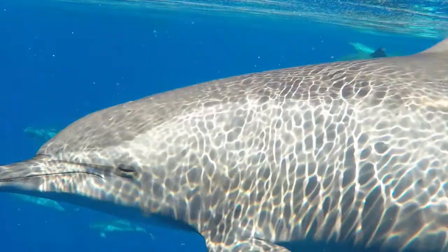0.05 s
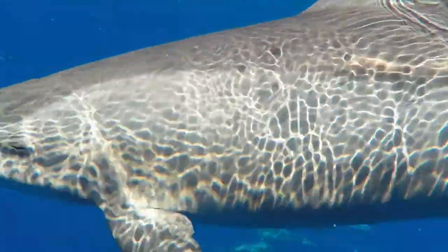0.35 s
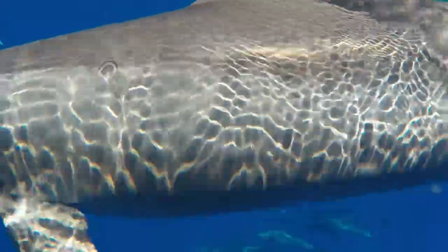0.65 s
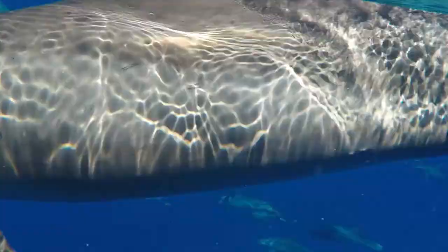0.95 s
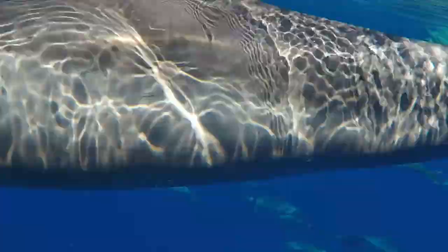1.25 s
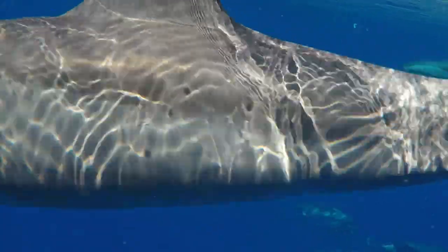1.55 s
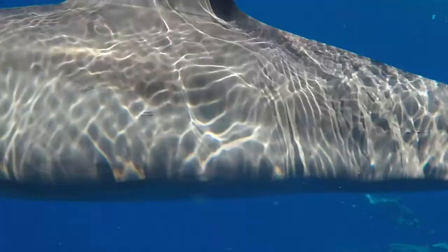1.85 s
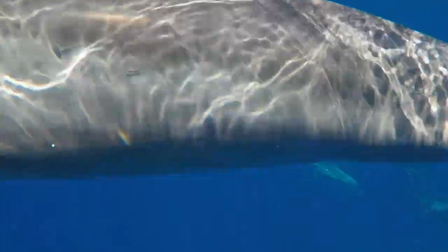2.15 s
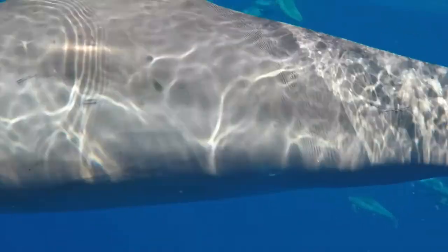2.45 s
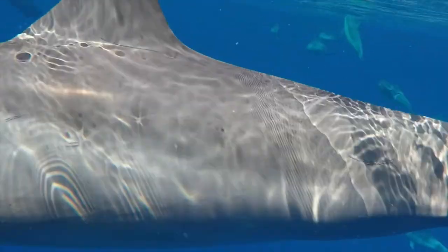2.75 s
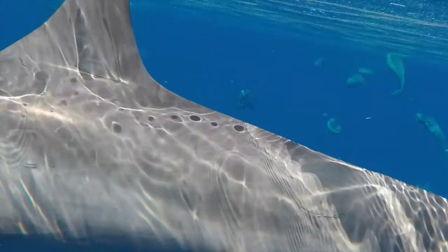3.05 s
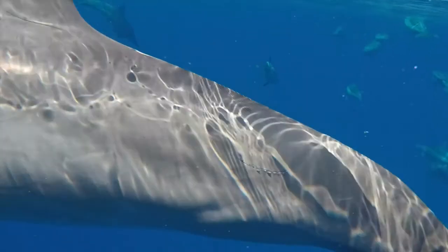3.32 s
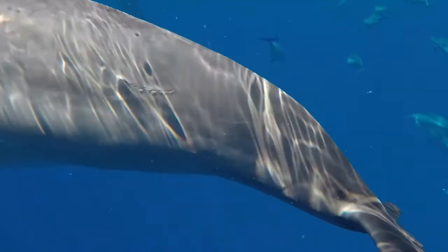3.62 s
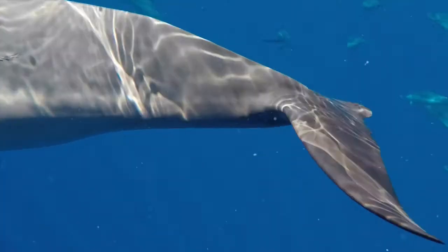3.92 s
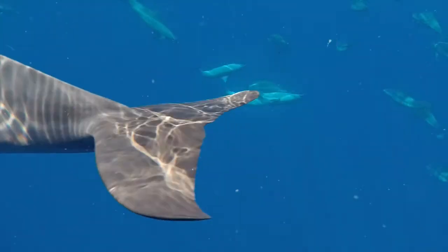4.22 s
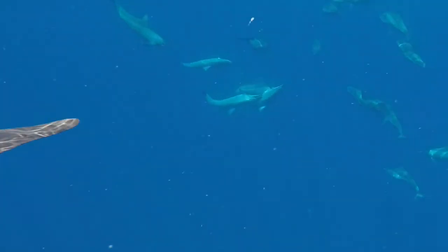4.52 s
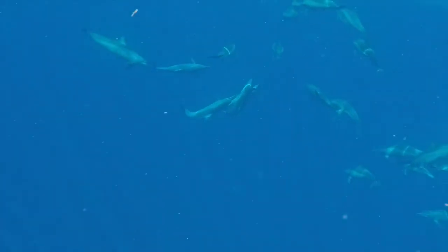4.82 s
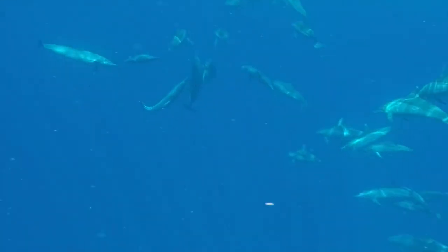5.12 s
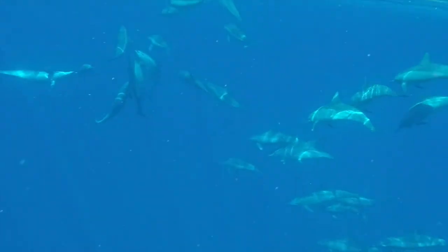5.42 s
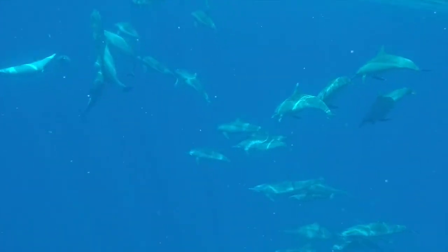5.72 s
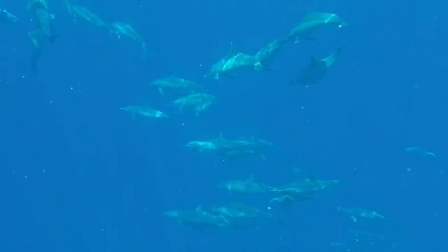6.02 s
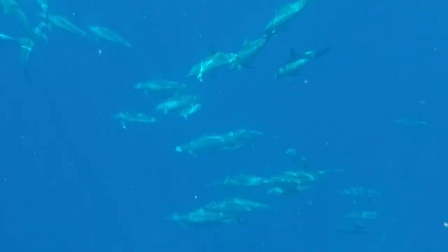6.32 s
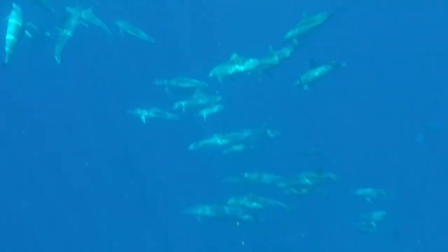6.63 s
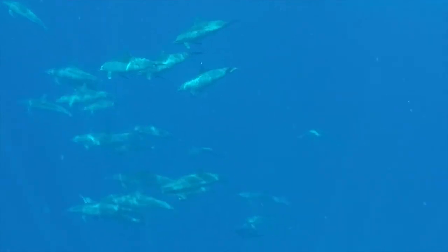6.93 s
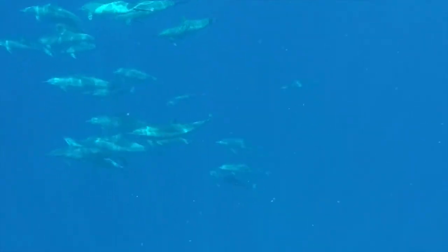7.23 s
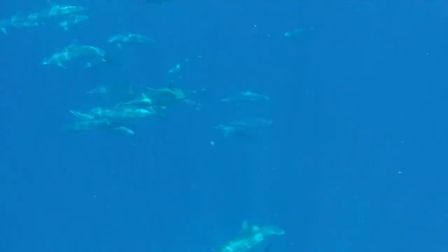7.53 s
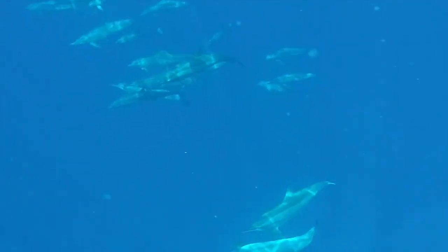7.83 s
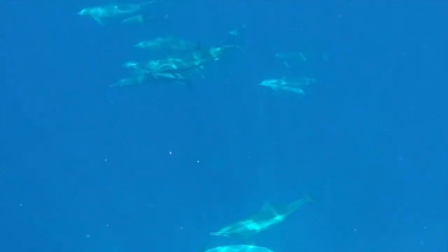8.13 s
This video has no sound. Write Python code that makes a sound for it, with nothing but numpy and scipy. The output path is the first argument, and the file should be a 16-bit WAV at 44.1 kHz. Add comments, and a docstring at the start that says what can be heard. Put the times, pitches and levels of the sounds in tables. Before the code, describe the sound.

Throughout, a microphone just under the sea surface picks up low rumbling, softly sloshing water and a fine crackle and ticking of distant dolphins. From about 1 to 4 seconds, closer dolphins send quick trains of sharp, ringing clicks, with a soft thump and a thin buzz near 2 seconds. A faint high whistle comes just after 3 seconds. From about 4 to 6 seconds, very high, fluttering whistles sweep upward one after another among scattered clicks, the strongest near 5.7 seconds. A thump and a bubble plop at 4.6 seconds lead into light taps. Between 5.9 and 6.5 seconds come a loud short buzz, knocks and rubs on the microphone casing, and deep thumps of water, the loudest moment. Two more long rising whistles run from 6.7 to 8 seconds, joined near the end by short buzzes, small plops and a very faint distant boat engine.

```python
"""Dolphins passing under water

A school passes a camera held just under the surface of the open sea. The dolphins whistle in long
rising sweeps that flutter under the moving surface; their clicks and buzzes ring the camera housing.
Turbulent water rumbles and washes past, bubbles plop, the housing is shoved, knocked and rubbed,
and a far boat engine drones."""
import sys
import numpy as np
from scipy import signal
from scipy.fft import rfft, irfft, next_fast_len
from scipy.io import wavfile

SR = 44100
rng = np.random.default_rng(int(sys.argv[2]) if len(sys.argv) > 2 else 0)


def master_out(mix):
    """Clip the mix to full scale and print it as 16-bit PCM to the path in sys.argv[1]."""
    frames = np.transpose(np.atleast_2d(mix))
    ceiling = np.clip(frames, -1, 1)
    pcm = np.round(ceiling * 32767).astype(np.int16)
    wavfile.write(sys.argv[1], SR, pcm)


N = 360297
TIME = np.arange(N) / SR
CUTOFF_HZ = 15500


def from_db(db):
    """Decibels to gain."""
    return 10 ** (np.asarray(db) / 20)


def unit_rms(x):
    """Scale to unit power."""
    return x / np.sqrt(np.mean(x ** 2) + 1e-20)


def curve(rows):
    """Rows of (t/s, value) interpolated at every sample."""
    return np.interp(TIME, *np.transpose(rows))


def add(out, start_s, sound):
    """Mix a sound in from start_s on."""
    i = int(np.clip(start_s * SR, 0, N - 1))
    out[i:i + len(sound)] += sound[:N - i]


def drift(rate_hz, size=N):
    """Smooth random wander, rms 1."""
    knots = rng.standard_normal(4000)
    return unit_rms(np.interp(np.arange(size) * rate_hz / SR, np.arange(len(knots)), knots))


def coloured(x, spectrum):
    """Shape by rows of (f/Hz, gain/dB), silent outside them; rms 1."""
    hz, db = np.transpose(spectrum)
    size = next_fast_len(N)
    log_hz = np.log(np.fft.rfftfreq(size, 1 / SR) + 1)
    gain = from_db(np.interp(log_hz, np.log(hz), db, left=-np.inf, right=-np.inf))
    return unit_rms(irfft(rfft(x, size) * gain, size)[:N])


def band(x, low_hz, high_hz, order=2):
    """Causal band-pass."""
    sos = signal.butter(order, [low_hz, high_hz], "band", fs=SR, output="sos")
    return signal.sosfilt(sos, x + 1e-18)


def ring(clicks, hz, t60_s):
    """One mode: a unit click starts a decaying sine of height 1."""
    r, w = np.exp(-np.log(1000) / (t60_s * SR)), 2 * np.pi * hz / SR
    return signal.lfilter([0, np.sin(w)], [1, -2 * r * np.cos(w), r * r], clicks + 1e-18)


def pulse_train(rate_hz, click_at_start=False):
    """One unit pulse per cycle of a varying rate."""
    return np.diff(np.floor(np.cumsum(rate_hz) / SR), prepend=-1 if click_at_start else 0)


def sea_echo(x, t60_s, wet_db):
    """Scatter from the rippled surface trails behind a sound."""
    t = np.arange(SR) / SR
    tail = rng.standard_normal(SR) * np.exp(-np.log(1000) * t / t60_s) * (1 - np.exp(-t / 0.0031))
    return x + from_db(wet_db) * signal.fftconvolve(x, tail / np.linalg.norm(tail))[:N]


# Swells past the housing: crest/s, rise/s, fall/s, slosh/dB, wash/dB
SWELLS = [(.6, .22, 0.34, -59.5, -50.5), (1.42, 0.14, 0.17, -58.5, -52.5), (1.82, 0.077, 0.13, -53, -52.5),
          (2.27, 0.1, 0.07, -55.5, -53), (3.33, 0.34, 0.44, -60, -50.5), (3.8, 0.068, 0.19, -62.5, -63.5),
          (4.75, 0.49, 0.78, -57.5, -53.5), (5.93, 0.056, 0.087, -36.5, -65), (6.3, 0.23, 0.087, -53, -55),
          (6.85, 0.49, 0.3, -55.5, -55.5), (8.05, 0.46, 0.37, -58.5, -55)]


def swells(calm_slosh_db=-67, calm_wash_db=-63):
    """Slosh and wash envelopes in dB: each swell builds and ebbs over the calm."""
    slosh_power, wash_power = from_db(calm_slosh_db) ** 2, from_db(calm_wash_db) ** 2
    for crest_s, rise_s, fall_s, slosh_db, wash_db in SWELLS:
        width_s = np.where(TIME < crest_s, rise_s, fall_s)
        shape = np.exp(-np.minimum(((TIME - crest_s) / width_s) ** 2, 20))
        slosh_power += shape * from_db(slosh_db) ** 2
        wash_power += shape * from_db(wash_db) ** 2
    return 10 * np.log10(slosh_power), 10 * np.log10(wash_power)


def turbulence(level_db, spectrum, grain_db, grain_hz):
    """Water noise that comes in lumps."""
    lumps = rng.standard_normal(N) * from_db(grain_db * drift(grain_hz))
    return from_db(level_db) * coloured(lumps, spectrum)


# Water spectra: f/Hz, gain/dB
RUMBLE_SPECTRUM = [(12, 5), (22, 5), (32, -7), (48, -3.5), (70, -10.5), (110, -27), (200, -65)]
SLOSH_SPECTRUM = [(45, -55), (80, 1), (130, 1), (200, -2.5), (300, -13), (500, -20.5), (900, -50)]
WASH_SPECTRUM = [(180, -19), (330, -1.5), (470, -5.5), (620, 2), (820, -1), (1020, -12), (1350, -11.5),
                 (1550, -14), (2500, -22)]
FIZZ_SPECTRUM = [(800, -7), (1150, -1), (1400, -4), (1650, 1), (1950, -1), (2800, -29)]


def water():
    """Rumble, slosh and wash follow the swells; tiny bubbles fizz in the stronger ones."""
    slosh_db, wash_db = swells()
    rumble_db = -46 + 0.25 * (slosh_db + 67)
    fizz_db = -66 + 1.64 * (wash_db + 47.5)
    rumble = turbulence(rumble_db, RUMBLE_SPECTRUM, grain_db=3, grain_hz=12)
    slosh = turbulence(slosh_db + 3, SLOSH_SPECTRUM, grain_db=2.5, grain_hz=40)
    wash = turbulence(wash_db - 2.5, WASH_SPECTRUM, grain_db=2, grain_hz=150.5)
    fizz = turbulence(fizz_db, FIZZ_SPECTRUM, grain_db=1.5, grain_hz=203)
    return rumble + slosh + wash + fizz


# Engine envelope: t/s, level/dB
ENGINE_LEVEL = [(0, -75), (3.5, -68), (6.5, -82), (7.2, -56), (8.17, -65)]
# Engine spectrum: f/Hz, gain/dB
ENGINE_SPECTRUM = [(450, -36), (590, -8), (645, 8), (700, -6), (900, -75)]


def engine():
    """A far boat drones as a narrow band of noise."""
    return from_db(curve(ENGINE_LEVEL)) * coloured(rng.standard_normal(N), ENGINE_SPECTRUM)


# Crackle envelope: t/s, level/dB
CRACKLE_LEVEL = [(0.0, -63), (1.09, -59.5), (5.96, -58.5), (6.12, -56), (6.53, -59.5), (8.17, -55.5)]
# Crackle spectrum: f/Hz, gain/dB
CRACKLE_SPECTRUM = [(900, -9), (1500, -16), (1700, 3.5), (1950, 0), (2200, -8), (2620, 4.5), (3000, -3.5),
                    (3350, -0.5), (3700, -7), (5000, -12), (5900, -12), (6700, -17), (7500, -12),
                    (10000, -18), (15500, -20.5)]


def far_crackle(rate_hz=700, spread_db=4, hiss_gain=0.35):
    """Countless far clicks of the school merge into a fine crackle."""
    sizes = from_db(spread_db * np.minimum(rng.exponential(1, N), 4)) * rng.choice([-1, 1], N)
    clicks = sizes * (rng.random(N) < rate_hz / SR)
    hiss = hiss_gain * rng.standard_normal(N)
    return from_db(curve(CRACKLE_LEVEL) - 0.3) * coloured(clicks + hiss, CRACKLE_SPECTRUM)


# Tick envelope: t/s, level/dB
TICK_LEVEL = [(0, -48.5), (1, -52), (2.102, -50.5), (3, -49.5), (4, -48), (5.5, -58), (6.5, -54),
              (8.17, -69)]


def far_ticks(rate_hz=70, spread_db=4):
    """Other dolphins' beams sweep by as thin, bright ticks at random times."""
    sizes = from_db(curve(TICK_LEVEL) + spread_db * np.minimum(rng.exponential(1, N), 3))
    ticks = sea_echo(sizes * (rng.random(N) < rate_hz / SR), t60_s=0.012, wet_db=2.5)
    return band(ticks, 11800, 12200) + from_db(-5.5) * band(ticks, 2700, 8800)


# Housing modes: f/Hz, gain/dB, t60/s
HOUSING_MODES = [(1810, -27, 0.022), (2704, -2, 0.012), (3277, -1.5, 0.012), (4010, 2, 0.0037),
                 (5860, -1.5, 0.0068), (7300, -25, 0.013)]


def housing(clicks):
    """Pressure pulses ring the housing's modes."""
    return sum(from_db(db) * ring(clicks, hz, t60_s) for hz, db, t60_s in HOUSING_MODES)


# Far scan envelope: t/s, level/dB
FAR_SCAN_LEVEL = [(0, -59), (.4, -54), (.8, -54), (1.2, -56), (1.8, -56), (2.6, -47), (3.0, -51),
                  (4.4, -49.5), (6.6, -59), (8.17, -66)]


def far_scan(rate_hz=27, spread_db=1):
    """A far dolphin scans at an uneven pace, ringing the housing."""
    pulses = pulse_train(rate_hz * from_db(2 * drift(14)))
    return housing(pulses * from_db(curve(FAR_SCAN_LEVEL) - 3.5 + spread_db * drift(60)))


# Bright scan envelope: t/s, level/dB
BRIGHT_SCAN_LEVEL = [(0, -58), (1.2, -49), (2.4, -44), (3.1, -43), (3.5, -58), (6.3, -54), (6.55, -46),
                     (7, -56), (8.17, -62)]


def bright_scan(rate_hz=36, spread_db=3):
    """A far dolphin scans fairly evenly, heard only in the top treble."""
    pulses = pulse_train(rate_hz * from_db(1.4 * drift(8)))
    clicks = pulses * from_db(curve(BRIGHT_SCAN_LEVEL) + spread_db * drift(50))
    return band(sea_echo(clicks, t60_s=0.0045, wet_db=7.5), 12000, 14000)


# Shoves of water: t/s, level/dB, first f/Hz, last f/Hz, rise/s
THUMPS = [(0.128, -37, 45, 31.5, 0.04), (1.96, -35.5, 54.7, 30, 0.024), (4.578, -23, 129, 90, 0.0038),
          (5.937, -19, 70, 32.8, 0.012), (6.174, -9, 55, 21.3, 0.014), (6.396, -21, 48, 23.3, 0.021)]


def thumps(glide_s=0.02):
    """A shove of water on the housing swings the pressure a few times, ever slower."""
    out, t = np.zeros(N), np.arange(SR // 2) / SR
    for start_s, db, first_hz, last_hz, rise_s in THUMPS:
        hz = last_hz + (first_hz - last_hz) * np.exp(-t / glide_s)
        envelope = from_db(db) * t / rise_s * np.exp(1 - t / rise_s)
        add(out, start_s, -envelope * np.sin(2 * np.pi * np.cumsum(hz) / SR))
    return out


# Bumps and rubs: t/s, rise/s, decay/s, level/dB, f/Hz
KNOCKS = [(0.224, 0.0011, .003, -45.5, 650), (1.529, 0.017, 0.046, -44.5, 168),
          (1.97, .01, 0.034, -40, 111), (4.577, 0.0036, 0.0061, -36, 327), (3.336, .001, .003, -49, 900),
          (4.726, 0.0018, 0.0046, -41, 456), (4.783, 0.0014, 0.0031, -47.5, 645),
          (4.865, 0.0017, 0.0043, -46.5, 545), (4.933, .002, 0.0056, -45.5, 600),
          (4.987, 0.0016, 0.0037, -43.5, 420), (5.881, 0.00088, 0.0015, -29, 830),
          (5.889, 0.02, 0.015, -29, 148), (5.94, 0.024, 0.016, -28.5, 157),
          (5.993, 0.0055, 0.036, -33.5, 170), (6.164, 0.0049, 0.0035, -20.5, 1700),
          (6.272, 0.013, 0.004, -40.5, 2380), (6.289, 0.0031, 0.0068, -36.5, 1280),
          (6.322, 0.0072, .012, -42.5, 900), (6.394, 0.0016, 0.017, -36, 565),
          (6.416, 0.001, 0.0065, -33, 1290), (6.746, 0.0039, 0.024, -41.5, 626),
          (7.608, 0.00086, 0.001, -38, 1140)]


def knocks(grain_db=3, rattle_db=-27):
    """Short bursts of stick and slip on the housing, each in its own band."""
    out, t = np.zeros(N), np.arange(SR // 4) / SR - 0.05
    for peak_s, rise_s, decay_s, db, hz in KNOCKS:
        slips = rng.standard_normal(len(t)) * from_db(grain_db * drift(922.5, len(t)))
        rub = band(slips, hz * 0.43, hz * 0.76, order=1)
        rub = unit_rms(band(rub, hz * 0.054, hz * 6, order=1))
        envelope = from_db(db) * np.exp(-np.where(t < 0, -t / rise_s, t / decay_s))
        add(out, peak_s + t[0], envelope * rub)
    return out + from_db(rattle_db) * housing(out)


# Sonar scans: start/s, end/s, first gap/s, last gap/s, first level/dB, last level/dB, ring f/Hz
SCANS = [(1.158, 1.431, 0.027, .045, -47, -44.5, 2700), (1.483, 1.699, 0.049, 0.039, -43.5, -39.5, 2570),
         (1.725, 2.1552, 0.04, 0.035, -42.5, -35.5, 2570), (2.298, 2.454, .049, .054, -31.5, -37, 2680),
         (2.498, 2.7084, .043, .041, -38, -44, 2740), (3.402, 3.6645, .049, .038, -40.5, -40, 2550),
         (3.691, 3.8703, 0.028, 0.031, -38, -40.5, 3100)]


def scan_clicks(sharpness_db=-22.5, spread_db=2.5):
    """Click trains gliding in pace and strength; yields rows like LONE_CLICKS."""
    for start_s, end_s, first_gap_s, last_gap_s, first_db, last_db, centre_hz in SCANS:
        count = round(2 * (end_s - start_s) / (first_gap_s + last_gap_s))
        gaps_s = np.linspace(first_gap_s, last_gap_s, count)
        for along in np.append(0, np.cumsum(gaps_s)) / gaps_s.sum():
            db = first_db + (last_db - first_db) * along + spread_db * rng.standard_normal()
            yield start_s + (end_s - start_s) * along, db, sharpness_db, centre_hz


# Single sonar clicks: t/s, level/dB, sharpness/dB, ring f/Hz
LONE_CLICKS = [(1.0998, -37, -22, 1710), (1.2442, -38.5, -19, 1700), (1.3077, -34.5, -11.5, 2700),
               (1.3418, -39, -24, 2710), (2.1829, -33, -16, 2610), (2.228, -37, -21, 2540),
               (2.7237, -39.5, -24, 1830), (2.7917, -39, -24, 2610), (3.338, -44, -17, 1870),
               (4.0323, -42.5, -11, 2550), (4.6113, -35, -20, 1880), (4.735, -39, -17, 1790),
               (4.817, -38, -21, 3520), (4.8647, -39, -23, 2680), (4.9718, -34, -23, 1670),
               (5.0937, -33, -22, 1690), (5.1254, -24.5, -39, 2920), (5.231, -34.5, -22, 1690),
               (5.3655, -51, 7, 1780), (5.402, -38.5, -22, 2580), (6.0613, -27, -14.5, 2520)]


def sonar(ring_db=-1, focus_db_per_octave=38, edge_db=16, top_db=-3):
    """Each click rings the housing modes near its pitch; a beam aimed at the camera adds a sharp edge."""
    times_s, db, sharpness_db, centre_hz = np.transpose(LONE_CLICKS + list(scan_clicks()))
    at = (times_s * SR).astype(int)
    drives = np.array([from_db(mode_db - focus_db_per_octave * abs(np.log2(hz / centre_hz)))
                       for hz, mode_db, _ in HOUSING_MODES])
    drives *= from_db(db + ring_db) / np.linalg.norm(drives, axis=0)
    rings = sum(ring(np.bincount(at, drive, N), hz, t60_s)
                for drive, (hz, _, t60_s) in zip(drives, HOUSING_MODES))
    pulses = np.bincount(at, from_db(db + sharpness_db + edge_db), N)
    edges = band(pulses, 4200, 9800, order=1) + from_db(top_db) * band(pulses, 11700, 13000)
    edges = sea_echo(edges, t60_s=0.0046, wet_db=9.5)
    return sea_echo(band(rings, 1360, 5400) + edges, t60_s=0.16, wet_db=-34)


# Buzzes: t/s, length/s, first rate/Hz, last rate/Hz, level/dB, centre f/Hz
BUZZES = [(2.07, 0.13, 842, 831, -43, 1630), (2.083, 0.17, 865, 803, -54, 7600),
          (3.917, 0.04, 511, 372, -34, 3160), (5.363, 0.27, 420, 605, -45, 8100),
          (5.954, 0.012, 408, 308, -15.5, 2570), (5.959, 0.026, 234, 112, -18.5, 4100),
          (7.413, 0.015, 299, 296, -34, 4300), (7.53, 0.17, 148, 255.6, -32.5, 4140),
          (7.991, 0.084, 487, 402, -30.5, 4400)]


def buzzes(ring_db=-22, body_db=12, edge_db=-2, band_ratio=1.13, jitter=0.014):
    """Clicks run together at a gliding rate; each train has its own band and fades at its end."""
    clicks, bodies = np.zeros(N), np.zeros(N)
    for start_s, length_s, first_hz, last_hz, db, centre_hz in BUZZES:
        along = np.linspace(0, 1, int(length_s * SR))
        rate_hz = first_hz + (last_hz - first_hz) * along ** 2
        rate_hz *= 1 + jitter * drift(300, len(along))
        envelope = from_db(db + drift(204, len(along))) * (1 - along ** 4)
        pulses = envelope * pulse_train(rate_hz, click_at_start=True)
        body = band(np.pad(pulses, (0, SR // 100)), centre_hz / band_ratio, centre_hz * band_ratio)
        add(clicks, start_s, pulses)
        add(bodies, start_s, body)
    edges = band(clicks, 5500, 8100)
    return from_db(ring_db) * housing(clicks) + from_db(body_db) * bodies + from_db(edge_db) * edges


def whistle(contour, waver=0.0042, flutter_db=2, overtone_db=-11, overtone_hz=5400, rasp=0.085):
    """A nearly pure tone fluttering under the moving surface; low notes rasp and show overtones."""
    times_s, hz, db = np.transpose(contour)
    t = np.arange(times_s[0], times_s[-1], 1 / SR)
    pitch_hz = np.interp(t, times_s, hz) * (1 + waver * drift(160, len(t)))
    level = from_db(np.interp(t, times_s, db) + flutter_db * drift(163.4, len(t)))
    gate = np.clip(np.minimum(t - t[0], t[-1] - t) / 0.00056, 0, 1)
    richness = np.minimum(from_db(overtone_db) * (overtone_hz / pitch_hz) ** 8, 0.5)
    rough_hz = pitch_hz * (1 + rasp * richness * drift(694, len(t)))
    phase = 2 * np.pi * np.cumsum(rough_hz) / SR
    overtones = sum(np.sin(k * phase) * (k * pitch_hz < CUTOFF_HZ) for k in (2, 3, 4))
    return gate * level * (np.sin(phase) + richness * overtones)


# Repeats of one signature whistle: start/s, dip/s, leap/s, end/s, start/Hz, crest/Hz, leap/Hz, hop/Hz,
# climb lateness (exponent), start/dB, crest/dB, dip/dB, early climb/dB, late climb/dB, top/dB
SIGNATURES = [(3.906, 4.232, 4.632, 4.807, 8360, 8450, 12070, 553, 1.28, -54, -48.5, -61.5, -38.5, -45.5, -43),
              (4.884, 5.071, 5.447, 5.558, 3370, 8120, 12590, 3, 0.79, -45, -51.5, -49, -37, -38, -52),
              (6.671, 6.843, 7.217, 7.34, 3710, 8530, 12620, 4, .8, -54, -61.5, -46.5, -47.5, -52, -45.5),
              (7.305, 7.585, 7.911, 8.1, 7570, 8560, 12200, 515, 1.15, -59.5, -52.5, -57, -51, -53.5, -46)]
# Small pitch hops: offset from leap/s, share of the call's hop
HOPS = [(-.118, 1), (-.066, 0.54), (.062, .6)]
# Transmission to the microphone: f/Hz, gain/dB
SIGNATURE_RESPONSE = [(7800, 1), (8400, 0.5), (9400, 2), (10100, 1.5), (10900, -6), (12000, 4.5),
                      (12800, -0.5), (14000, 4), (15000, -1)]


def signature(start_s, dip_s, leap_s, end_s, start_hz, crest_hz, leap_hz, hop_hz, lateness, *levels_db):
    """A whistle that scoops up to a crest, sags, climbs, leaps and runs on to the top."""
    dip_hz, jump_hz, top_hz = 7807, 680, 14950
    linger_hz, linger_width_hz = 4680, 1000
    scoop_s, hop_settle_s, release_s, release_db = 0.034, 0.031, 0.018, 12
    t = np.linspace(start_s, end_s, 1000)
    sag, climb, run = (np.clip((t - a) / (b - a), 0, 1)
                       for a, b in ((start_s, dip_s), (dip_s, leap_s), (leap_s, end_s)))
    hz = crest_hz + (start_hz - crest_hz) * np.exp(-((t - start_s) / scoop_s) ** 2)
    hz += (dip_hz - crest_hz) * np.sin(np.pi / 2 * sag ** 1.6) ** 2
    hz -= (hz - linger_hz) * np.exp(-((hz - linger_hz) / linger_width_hz) ** 2)
    climb = climb ** lateness
    hz += (leap_hz - dip_hz) * (0.8 * np.sin(np.pi / 2 * climb) ** 2 + 0.2 * climb)
    hz += jump_hz * (t > leap_s) + (top_hz - leap_hz - jump_hz) * run ** 1.2
    for offset_s, share in HOPS:
        since_s = t - leap_s - offset_s
        hz += share * hop_hz / 2 * np.sign(since_s) * np.exp(-abs(since_s) / hop_settle_s)
    early_s, late_s = dip_s + 0.32 * (leap_s - dip_s), (dip_s + 2 * leap_s) / 3
    knots_s = [start_s, (start_s + dip_s) / 2, dip_s, early_s, late_s, (leap_s + end_s) / 2]
    db = np.interp(t, knots_s, levels_db) + np.interp(hz, *np.transpose(SIGNATURE_RESPONSE))
    db -= release_db * np.exp((t - end_s) / release_s)
    return whistle(np.column_stack([t, hz, db]), waver=0.002, flutter_db=2.08)


# Short whistle contours: t/s, f/Hz, level/dB
FAR_DIP = [(3.135, 10200, -70), (3.19, 9000, -58), (3.225, 8700, -53), (3.253, 9150, -60),
           (3.275, 10000, -57), (3.389, 12100, -68)]
FAR_RISE = [(4.25, 9880, -63), (4.28, 9300, -54), (4.388, 10970, -55), (4.48, 11910, -65)]
FAR_SWEEP = [(4.42, 5230, -60), (4.496, 5760, -50), (4.558, 7600, -50), (4.62, 7800, -56),
             (4.67, 8660, -50.5), (4.792, 12200, -57), (4.888, 14400, -55)]
NEAR_SCOOP = [(5.541, 8920, -60), (5.577, 8240, -53), (5.59, 7060, -42), (5.616, 6430, -49),
              (5.645, 6950, -36), (5.675, 7560, -30), (5.703, 7930, -33), (5.73, 9550, -43.5),
              (5.824, 13000, -66)]
NEAR_HOOK = [(5.945, 11800, -61), (5.985, 11280, -51), (6.033, 14330, -66)]
NEAR_CHIRP = [(7.61, 7300, -36), (7.617, 7370, -49), (7.632, 8300, -40.5), (7.668, 8900, -48),
              (7.688, 9920, -45)]


def whistles(fading_db=0.55, fading_hz=36):
    """The school's calls with a quick surface echo and a long faint tail; far calls waver more."""
    out = np.zeros(N)
    for call in SIGNATURES:
        add(out, call[0], signature(*call))
    out *= from_db(fading_db * drift(fading_hz))  # fading under the moving surface
    for contour in (NEAR_SCOOP, NEAR_HOOK, NEAR_CHIRP):
        add(out, contour[0][0], whistle(contour))
    for contour in (FAR_DIP, FAR_RISE, FAR_SWEEP):
        add(out, contour[0][0], from_db(-3) * whistle(contour, waver=0.006, flutter_db=3))
    echoed = sea_echo(from_db(-0.05) * out, t60_s=0.077, wet_db=-17.5)
    return sea_echo(echoed, t60_s=0.6, wet_db=-21)


# Bubbles: t/s, level/dB, f/Hz, decay/s
PLOPS = [(4.572, -33, 425, 0.0088), (5.88, -37, 680, 0.0015), (6.393, -24.5, 540, 0.0021),
         (7.607, -35, 810, 0.0016), (7.992, -40, 2770, 0.0055), (8.032, -34, 725, 0.0069)]


def plops(chirp_per_s=2.7, attack_s=0.0016):
    """Small bubbles ring briefly, rising a little in pitch."""
    out, t = np.zeros(N), np.arange(SR // 10) / SR
    for start_s, db, hz, decay_s in PLOPS:
        shape = np.exp(-t / decay_s) * (1 - np.exp(-t / attack_s))
        tone = np.sin(2 * np.pi * hz * t * (1 + chirp_per_s * t))
        add(out, start_s, from_db(db) * shape / shape.max() * tone)
    return out


def scene():
    """Water, a far engine, dolphins and bumps on the housing at one microphone."""
    background = water() + engine()
    near_dolphins = whistles() + sonar() + buzzes()
    far_dolphins = far_crackle() + far_ticks() + far_scan() + bright_scan()
    return (background + near_dolphins + far_dolphins + thumps() + knocks() + plops())[None]


def record(dry):
    """Steep low-pass on the top treble."""
    return signal.sosfilt(signal.ellip(10, 0.2, 80, CUTOFF_HZ, fs=SR, output="sos"), dry)


dry = scene()
out = record(dry)
master_out(out)
```